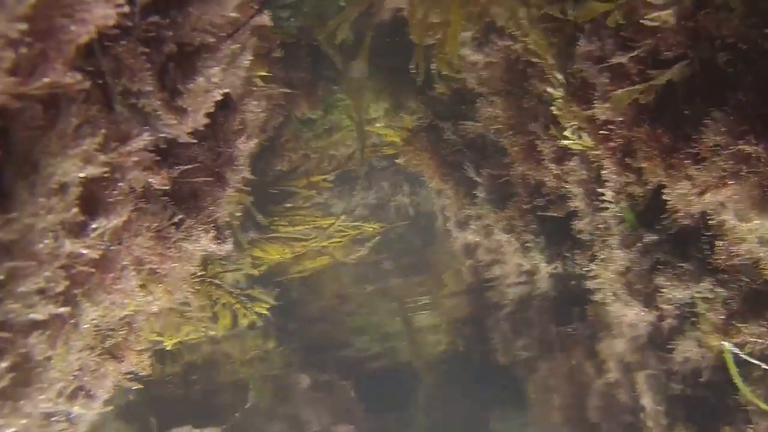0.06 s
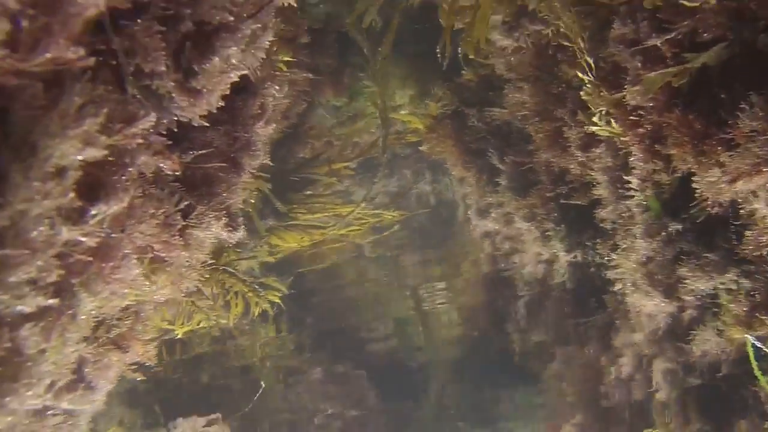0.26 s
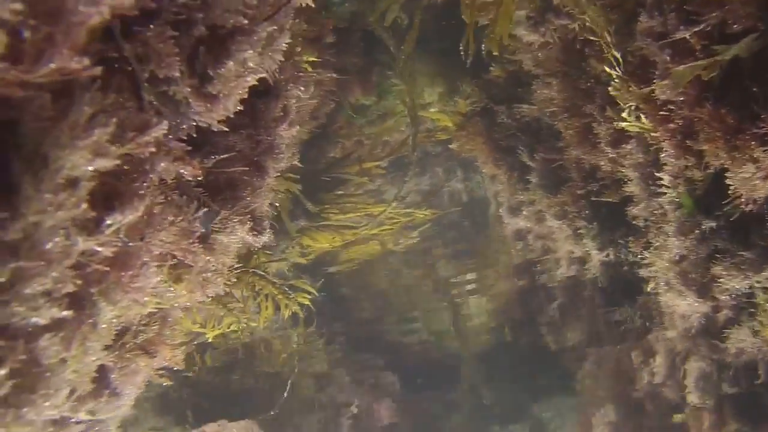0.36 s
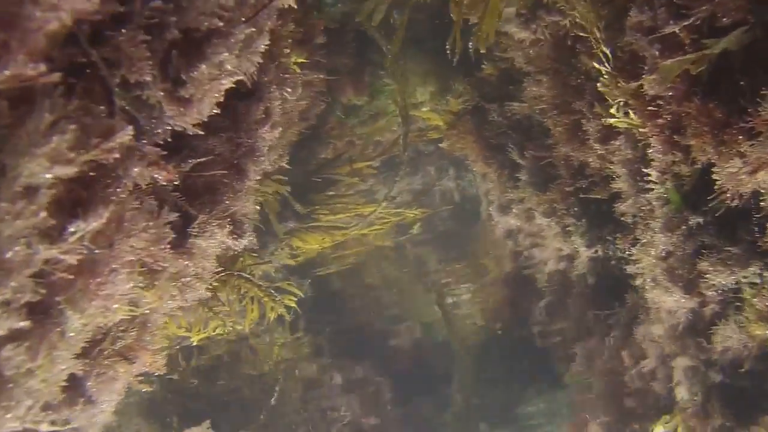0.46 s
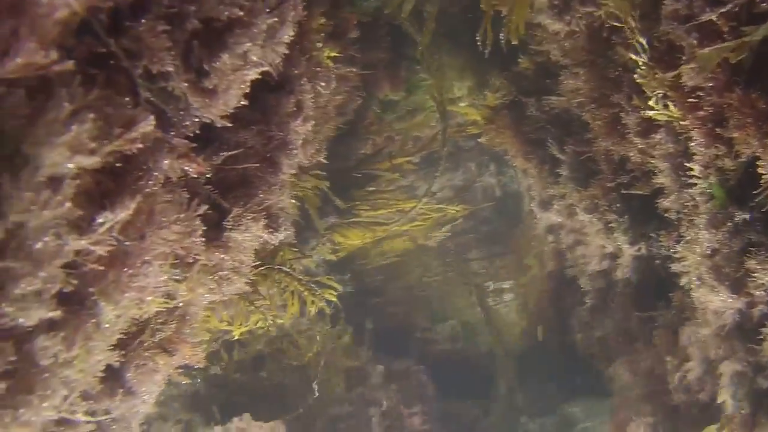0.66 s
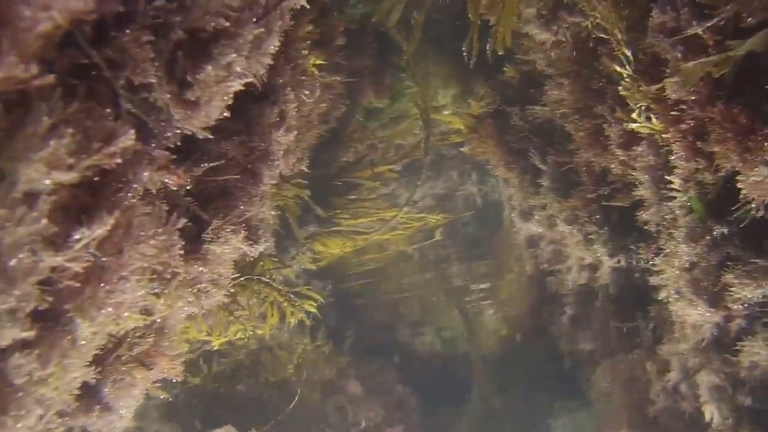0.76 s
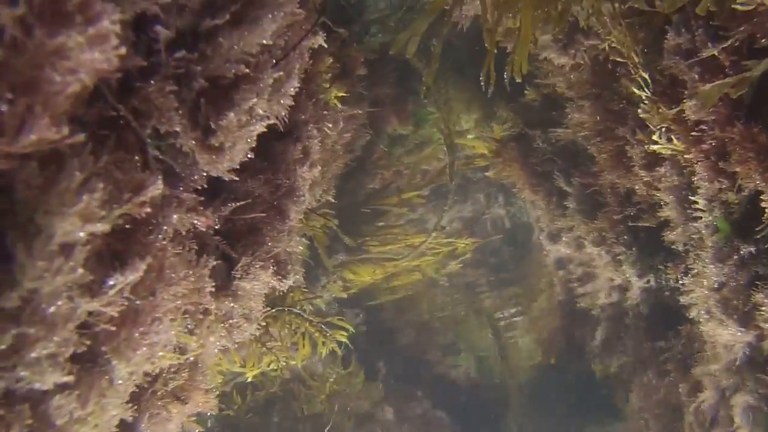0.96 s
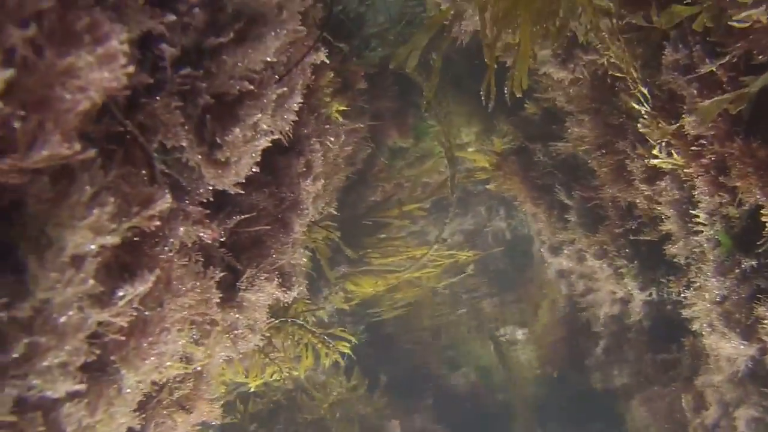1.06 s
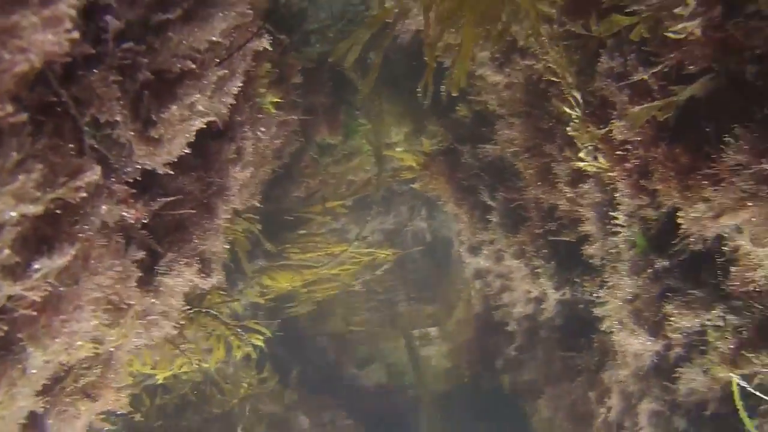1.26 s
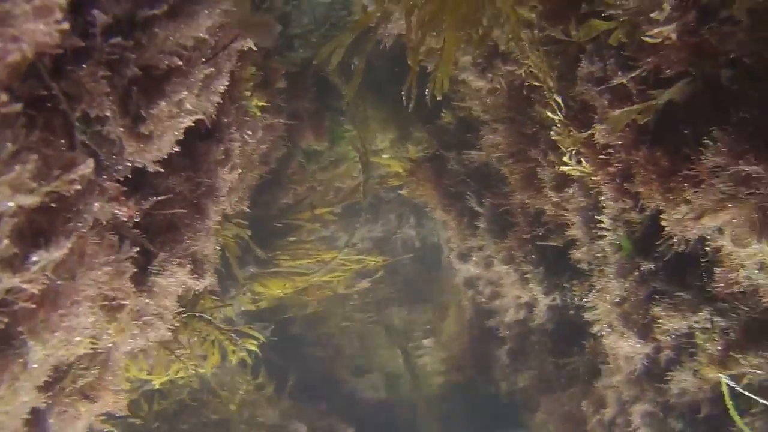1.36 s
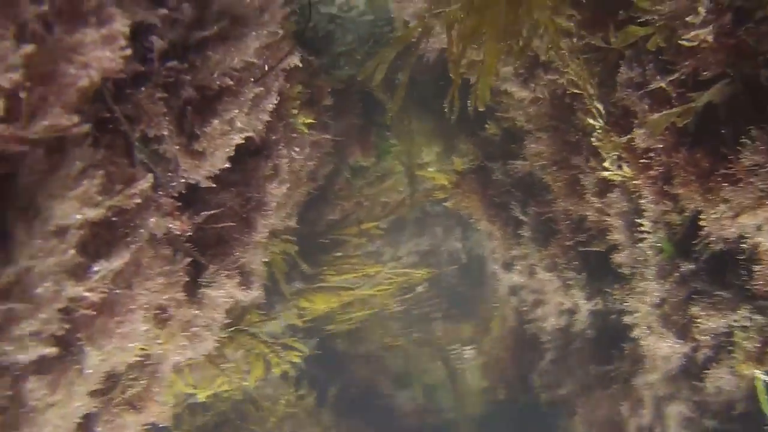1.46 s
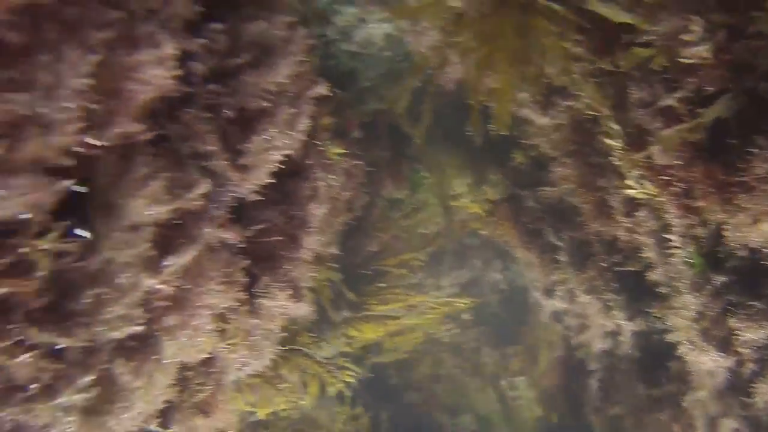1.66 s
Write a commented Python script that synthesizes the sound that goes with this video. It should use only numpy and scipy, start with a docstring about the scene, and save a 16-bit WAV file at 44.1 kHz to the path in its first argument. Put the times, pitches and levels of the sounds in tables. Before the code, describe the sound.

Water buffets a watertight camera case: low dull thumps, gritty hollow swishes, brief bubbly blips

```python
"""A watertight camera housing, jostled by moving water in a rocky pool, booms at a low pitch.
Boom: grainy noise through a low resonance; thumps: soft blows on decaying sines near the same pitch.
Surges: grains through shell resonances, hollow and scratchy; gurgles: brief wavering sines.
Knocks: filtered clicks ringing the shell modes. Deep rumble and faint steady hiss: coloured noise."""
import sys
import numpy as np
from scipy import signal
from scipy.fft import rfft, irfft
from scipy.io import wavfile
from scipy.ndimage import uniform_filter1d

SR = 44100
rng = np.random.default_rng(int(sys.argv[2]) if len(sys.argv) > 2 else 0)


def pcm_store(signal):
    """Save signal as 16-bit PCM."""
    levels = np.round(np.clip(np.atleast_2d(signal), -1, 1) * 32767)
    wavfile.write(sys.argv[1], SR, levels.astype(np.int16).T)


N = 74970  # samples, 1.7 s

# Surge strength driving the hollow resonances: (time [s], control level [dB])
SURGE_STRENGTH = [(0, -71), (0.022, -48), (.104, -59.5), (.136, -50), (.26, -51), (.316, -45), (.37, -53),
                  (.396, -63), (.435, -67), (0.454, -53.5), (.51, -48.5), (.585, -45.5), (.672, -59),
                  (.72, -47.5), (.75, -48.5), (.77, -54), (.8, -66), (.88, -57), (0.952, -46),
                  (1.03, -66.5), (1.11, -53), (1.15, -61), (1.188, -49), (1.204, -46), (1.279, -44),
                  (1.31, -54), (1.342, -44), (1.376, -47), (1.439, -45.5), (1.476, -52), (1.562, -56.5),
                  (1.618, -47.5), (1.7, -68)]
# Surge strength driving the scratchy resonances: (time [s], control level [dB])
SCRATCH_STRENGTH = [(0, -62.5), (.1, -65.5), (.21, -57.5), (.265, -64.5), (0.296, -51), (.35, -61.5),
                    (.39, -76), (0.469, -63), (.51, -63), (.56, -58.5), (.61, -68), (.68, -67.5),
                    (0.734, -56), (.755, -59), (.775, -73), (.89, -69), (0.951, -56.5), (1.02, -75),
                    (1.11, -65), (1.18, -68), (1.205, -55), (1.25, -52), (1.274, -49.5), (1.311, -64),
                    (1.34, -57.5), (1.44, -57), (1.48, -53), (1.56, -67.5), (1.62, -68.5), (1.7, -66)]
# Hollow resonances: (centre [Hz], width [Hz], level re mean [dB], growth [dB per dB of surge])
HOLLOW_PEAKS = [(530, 182, 0.5, 0.79), (654, 72, -3, 2.2), (825, 86, -18, 3.1), (985, 54, -26.5, 1.05)]
# Scratchy resonances: (centre [Hz], width [Hz], level re mean [dB], growth [dB per dB of surge])
SCRATCH_PEAKS = [(1346, 63, 2, 1.52), (1522, 138, 3.5, 1.1), (1750, 94, -14, 0.44), (2600, 350, -23.5, 0.3),
                 (3660, 1000, -21, 0.46)]
# Jostling by the water, as boom level: (time [s], level [dB])
JOSTLE = [(0, -47), (.12, -54), (.18, -47.5), (.22, -36), (.28, -51.5), (.31, -40.5), (.365, -39.5),
          (.41, -65.5), (.6, -46.5), (.67, -61), (.74, -37), (.81, -61.5), (.95, -45), (1.02, -60),
          (1.15, -50), (1.22, -36.5), (1.29, -38), (1.36, -47.5), (1.43, -38.5), (1.48, -53), (1.53, -45),
          (1.57, -54.5), (1.7, -50)]
# Deep rumble: (time [s], level [dB])
RUMBLE_LEVEL = [(0, -61), (.19, -48), (.3, -51), (.42, -51), (.65, -50.5), (.75, -43), (.8, -54.5),
                (.88, -48), (1.03, -51.5), (1.13, -49.5), (1.32, -51), (1.5, -48.5), (1.7, -49.5)]
# Rumble spectrum: (frequency [Hz], relative density [dB per Hz])
RUMBLE_COLOUR = [(15, -15), (26, 4), (39, 5), (55, 1), (90, -6), (130, -2), (220, -32.5), (300, -14.5),
                 (400, -23), (900, -53.5)]
# Hiss spectrum: (frequency [Hz], relative density [dB per Hz])
HISS_COLOUR = [(100, 5), (400, 11), (1100, 3.5), (2200, 1), (4000, -3), (7500, -8.5), (11000, -14.5),
               (15000, -23)]
# Ringing gurgles and bubble chirps: (time of peak [s], Gaussian sigma [s], level [dB], mean pitch [Hz])
GURGLES = [(0.02, 0.012, -48.5, 530), (0.293, 0.0037, -56, 1720), (0.408, .002, -56, 3380),
           (0.594, 0.017, -50.5, 636), (.731, 0.0019, -66, 4360), (.732, 0.0087, -60, 1800),
           (0.737, 0.011, -64.5, 3750), (0.739, 0.008, -39, 732), (0.75, 0.0017, -34.5, 800),
           (1.206, 0.0068, -41.5, 709), (1.208, 0.0079, -57.5, 1330), (1.219, .004, -51, 1360),
           (1.23, 0.004, -39, 734), (1.25, 0.0043, -42.5, 884), (1.268, 0.0052, -37.5, 699.3),
           (1.276, 0.0023, -47.5, 1730), (1.416, 0.0053, -42, 560), (1.438, .006, -41.5, 591),
           (1.477, 0.0074, -52.5, 1422), (1.532, 0.011, -66, 3980)]
# Soft blows on the housing: (time [s], impulse level [dB], pitch [Hz], t60 [s])
THUMPS = [(0.205, -42, 155, 0.04), (0.303, -31, 150, 0.099), (.354, -41, 150, 0.056),
          (0.446, -31.5, 150, 0.08), (.5153, -15, 150, .17), (0.7, -30.5, 117, 0.16),
          (1.1657, -23.5, 150.1, 0.19), (1.226, -24.5, 140, 0.07), (1.2835, -28.5, 148.6, 0.1),
          (1.327, -31, 126, 0.063)]
# Shell modes: (frequency [Hz], level [dB], t60 [s])
SHELL_MODES = [(310, -12, 0.043), (520, -3, 0.025), (632, -3, 0.016), (800, -11, 0.0067), (1360, -7, 0.012),
               (1556, -8.5, .016), (2370, -21.5, 0.014), (3500, -27, 0.0099), (4740, -16, 0.0038)]
# Hard knocks: (time [s], impulse level before filtering [dB], low edge [Hz], high edge [Hz])
KNOCKS = [(.4065, -31, 2600, 3900), (.447, -43, 380, 890), (0.8255, -28.5, 413, 5030),
          (0.8261, -31.5, 1060, 1760), (1.088, -46, 350, 1010), (1.1228, -23.5, 109, 570),
          (1.1277, -36, 283, 2100), (1.1666, -31, 333, 800)]

GRAINS_PER_S, GRAIN_SPREAD_DB, WASH_GAIN = 1400, 3.5, .5
HOLLOW_GAIN_DB, HOLLOW_MEAN_DB, HOLLOW_BAND_HZ = -4.5, -43.5, [447, 1040]
SCRATCH_GAIN_DB, SCRATCH_MEAN_DB, SCRATCH_BAND_HZ = -5, -48.5, [1100, 3930]
BOOM_HZ, BOOM_WIDTH_HZ, BOOM_LOWPASS_HZ = 150, 12.8, 185
BOOM_OCTAVE_DB, BOOM_OCTAVE_WIDTH_HZ = -17, 37
HISS_DB = -63
GURGLE_WAVER_FRACTION, GURGLE_WAVER_LOWPASS_HZ, GURGLE_FLUTTER_DB = .04, 75.6, 2
THUMP_LOWPASS_HZ, THUMP_HIGHPASS_HZ = 520, 34.2
THUMP_OCTAVE_DB, THUMP_OCTAVE_T60_S = -33.5, 0.18
THUMP_SHELL_DB, THUMP_SHELL_LOWPASS_HZ = -15.5, 660
CUTOFF_HZ = 15200


def from_db(db):
    """Decibels to amplitude gain."""
    return 10 ** (np.asarray(db) / 20)


def rms_one(x):
    """Scale to unit power."""
    return x / np.sqrt(np.mean(x ** 2) + 1e-20)


def level(points):
    """Gain over time, interpolated in dB."""
    return from_db(np.interp(np.arange(N) / SR, *np.transpose(points)))


def steady(x, size):
    """Divide out slow swings of power; size in samples, unit power out."""
    power = uniform_filter1d(uniform_filter1d(x ** 2, size), size)
    return rms_one(x / np.sqrt(np.abs(power) + 1e-20))


def passed(x, hz, kind, order=2):
    """Butterworth filter."""
    sos = signal.butter(order, hz, kind, fs=SR, output="sos")
    return signal.sosfilt(sos, x + 1e-18)


def coloured(points):
    """Unit-power noise with a spectrum interpolated over log frequency."""
    hz, db = np.transpose(points)
    bins_hz = np.maximum(np.arange(N // 2 + 1) * SR / N, 1)
    gain = from_db(np.interp(np.log(bins_hz), np.log(hz), db))
    return rms_one(irfft(rfft(rng.standard_normal(N)) * gain, N))


def resonance(x, hz, width_hz):
    """Two-pole band-pass with unit gain on top."""
    r = np.exp(-np.pi * width_hz / SR)
    b = np.array([1, 0, -1]) * (1 - r * r) / 2
    a = [1, -2 * r * np.cos(2 * np.pi * hz / SR), r * r]
    return signal.lfilter(b, a, x)


def ring(x, hz, t60_s):
    """Two-pole mode: a unit click starts a decaying sine of initial height 1."""
    r = np.exp(-np.log(1000) / (t60_s * SR))
    w = 2 * np.pi * hz / SR
    return signal.lfilter([0, np.sin(w)], [1, -2 * r * np.cos(w), r * r], x + 1e-18)


def click(time_s, db):
    """One impulse."""
    return from_db(db) * (np.arange(N) == int(time_s * SR))


def grains():
    """Dense random impacts of uneven size and sign over a smooth noise wash."""
    size_db = GRAIN_SPREAD_DB * np.minimum(rng.exponential(1, N), 4)
    impacts = from_db(size_db) * rng.choice([-1, 1], N)
    present = rng.random(N) < GRAINS_PER_S / SR
    return rms_one(impacts * present) + WASH_GAIN * rng.standard_normal(N)


def swelling(peaks, strength, mean_db, band_hz):
    """Grains through parallel resonances, each following the surge at its own rate."""
    source = passed(grains(), band_hz, "band", order=4)
    swell = level(strength) / from_db(mean_db)
    out = 0
    for hz, width_hz, db, growth in peaks:
        voice = steady(resonance(source, hz, width_hz), size=1100)
        out = out + from_db(mean_db + db) * swell ** growth * voice
    return out


def surges():
    """Gritty water surges excite the shell: a hollow low voice and a scratchy upper one."""
    hollow = swelling(HOLLOW_PEAKS, SURGE_STRENGTH, HOLLOW_MEAN_DB, HOLLOW_BAND_HZ)
    scratchy = swelling(SCRATCH_PEAKS, SCRATCH_STRENGTH, SCRATCH_MEAN_DB, SCRATCH_BAND_HZ)
    return from_db(HOLLOW_GAIN_DB) * hollow + from_db(SCRATCH_GAIN_DB) * scratchy


def boom():
    """Jostling water drives the housing's low resonance and, faintly, its octave."""
    hum = resonance(grains(), BOOM_HZ, BOOM_WIDTH_HZ)
    hum = rms_one(passed(hum, BOOM_LOWPASS_HZ, "low"))
    octave = rms_one(resonance(grains(), 2 * BOOM_HZ, BOOM_OCTAVE_WIDTH_HZ))
    mix = steady(hum, size=1300) + from_db(BOOM_OCTAVE_DB) * steady(octave, size=1300)
    return level(JOSTLE) * mix


def rumble():
    """Deep coloured noise, evened out, then following its level curve."""
    return level(RUMBLE_LEVEL) * steady(coloured(RUMBLE_COLOUR), size=3000)


def hiss():
    """Faint stationary coloured noise."""
    return from_db(HISS_DB) * coloured(HISS_COLOUR)


def gurgles():
    """Brief sines under Gaussian envelopes, randomly wavering in pitch and level."""
    t, out = np.arange(N) / SR, 0
    for time_s, sigma_s, db, hz in GURGLES:
        noise = rng.standard_normal((2, N))
        waver, flutter = rms_one(passed(noise, GURGLE_WAVER_LOWPASS_HZ, "low"))
        pitch_hz = hz * (1 + GURGLE_WAVER_FRACTION * waver)
        tone = np.sqrt(2) * np.sin(2 * np.pi * np.cumsum(pitch_hz) / SR)
        envelope = np.exp(-.5 * ((t - time_s) / sigma_s) ** 2)
        out = out + from_db(db + GURGLE_FLUTTER_DB * flutter) * envelope * tone
    return out


def shell(force):
    """Short shell modes in parallel, driven by a contact force."""
    return sum(from_db(db) * ring(force, hz, t60_s) for hz, db, t60_s in SHELL_MODES)


def thumps():
    """Soft blows ring a low mode, its faint octave and, dully, the shell."""
    out = 0
    for time_s, db, hz, t60_s in THUMPS:
        blow = click(time_s, db)
        octave = ring(blow, 2 * hz, THUMP_OCTAVE_T60_S)
        low = ring(blow, hz, t60_s) + from_db(THUMP_OCTAVE_DB) * octave
        low = passed(low, THUMP_LOWPASS_HZ, "low")  # softens the onset
        low = passed(low, THUMP_HIGHPASS_HZ, "high", order=1)
        dull = shell(passed(blow, THUMP_SHELL_LOWPASS_HZ, "low"))
        out = out + low + from_db(THUMP_SHELL_DB) * dull
    return out


def knocks():
    """Hard contacts, each a click with its own band, ring the shell."""
    force = 0
    for time_s, db, low_hz, high_hz in KNOCKS:
        force = force + passed(click(time_s, db), [low_hz, high_hz], "band", order=3)
    return shell(force)


def scene():
    """Sum of all sources at the microphone inside the housing; one channel."""
    water = surges() + boom() + rumble() + hiss() + gurgles()
    return (water + thumps() + knocks())[None]


def record(dry):
    """Steep elliptic low-pass: 0.2 dB ripple, 70 dB stopband."""
    sos = signal.ellip(10, .2, 70, CUTOFF_HZ, fs=SR, output="sos")
    return signal.sosfilt(sos, dry)


dry = scene()
out = record(dry)
pcm_store(out)
```